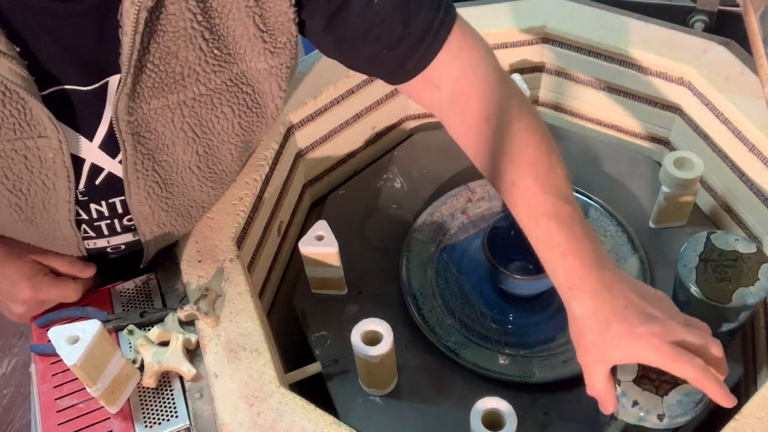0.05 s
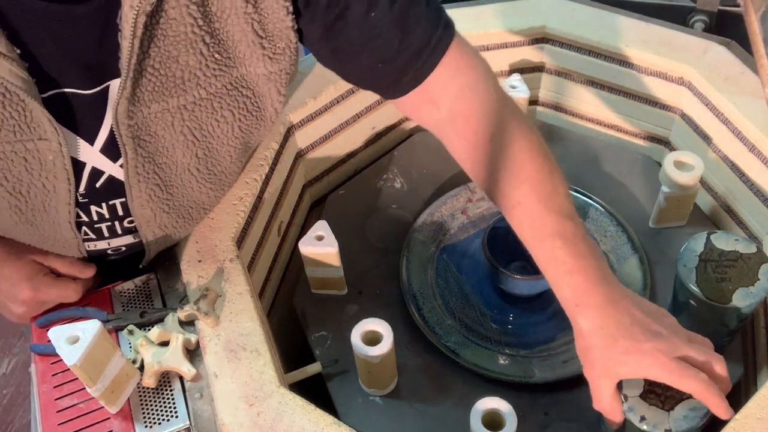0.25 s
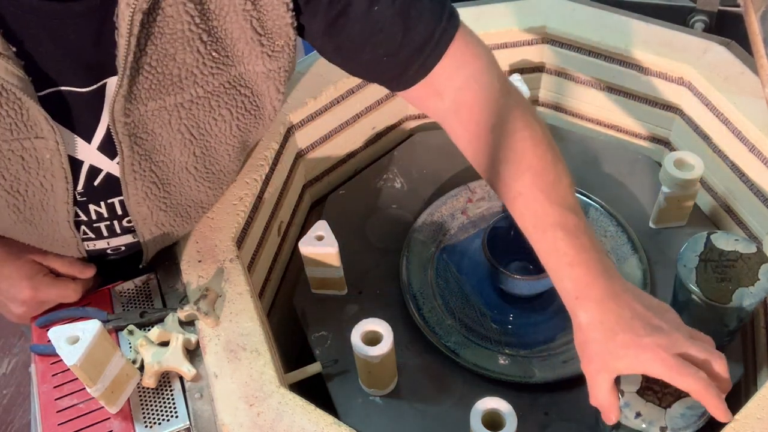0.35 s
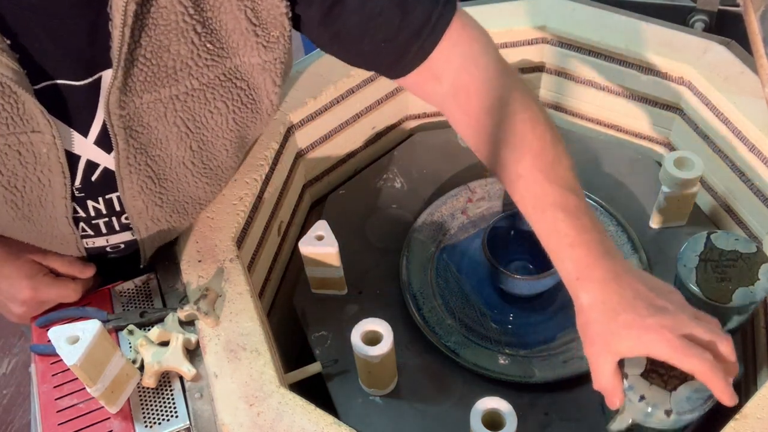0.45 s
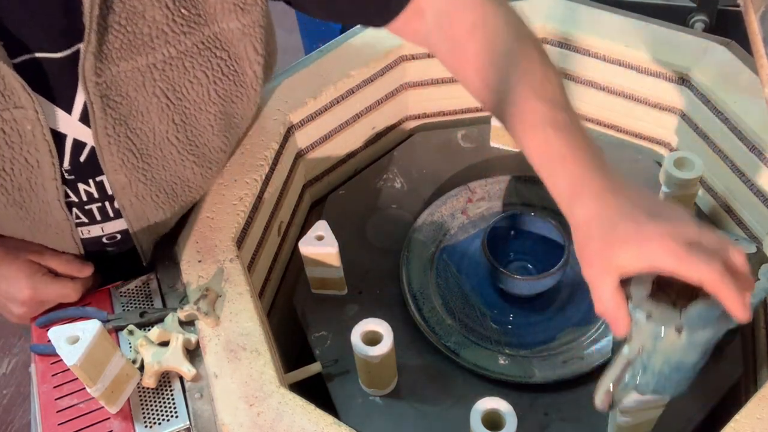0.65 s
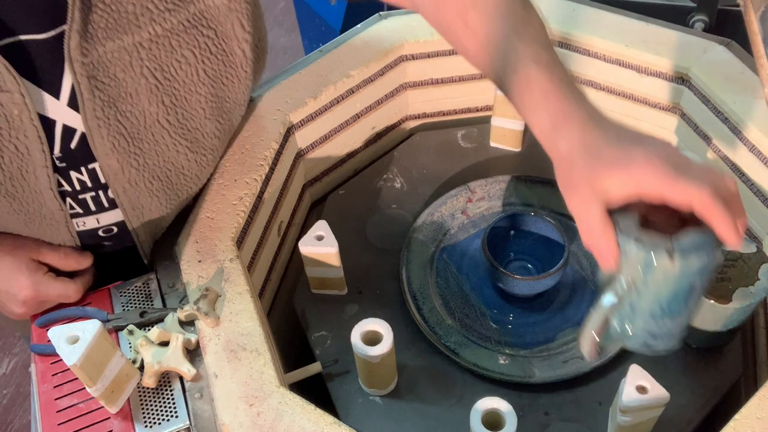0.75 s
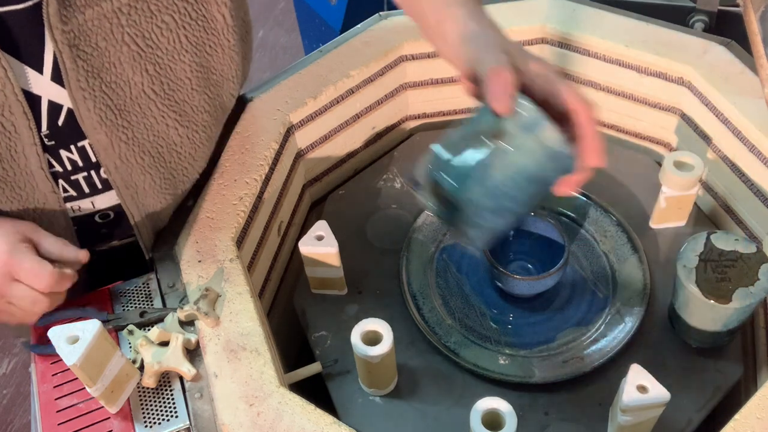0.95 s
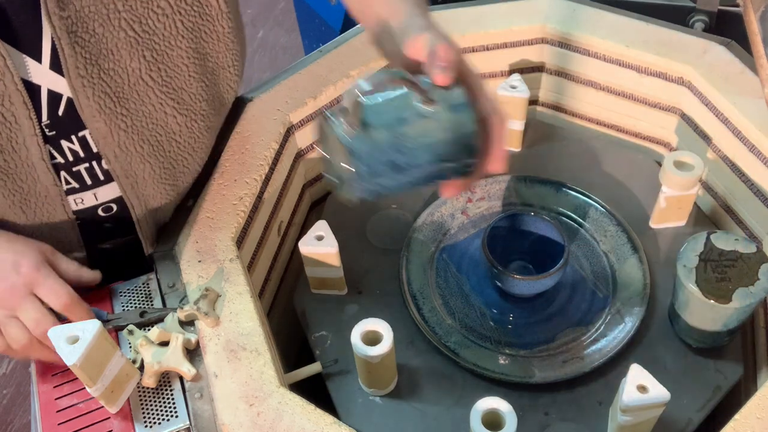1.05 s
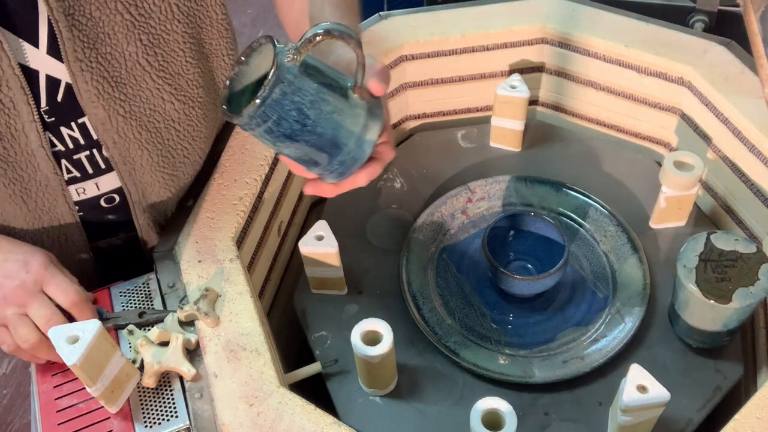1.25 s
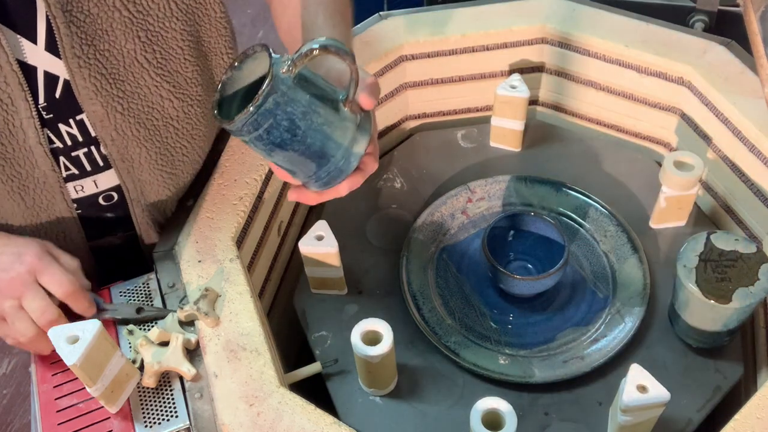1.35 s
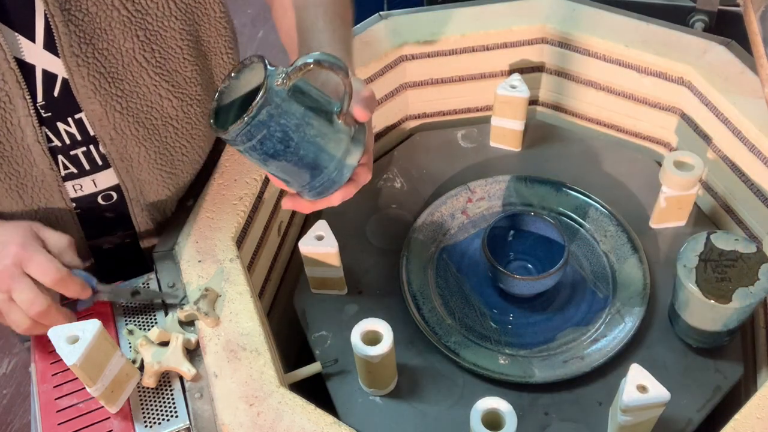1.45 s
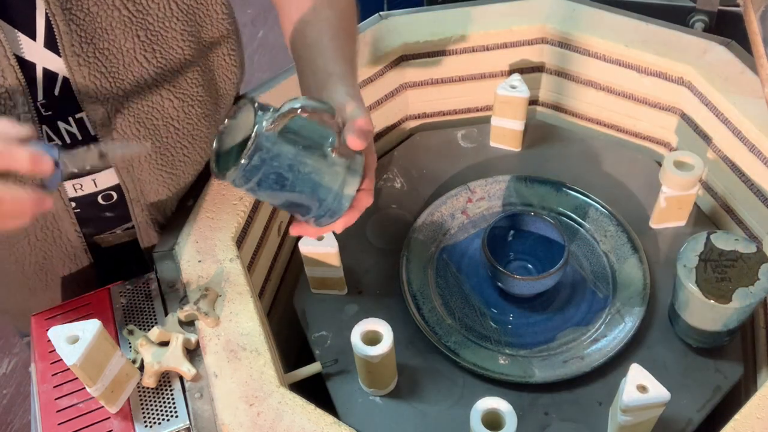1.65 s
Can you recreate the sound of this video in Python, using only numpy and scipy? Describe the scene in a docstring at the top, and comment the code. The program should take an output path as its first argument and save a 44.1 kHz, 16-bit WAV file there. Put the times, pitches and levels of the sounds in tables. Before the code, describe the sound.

A glazed ceramic mug knocks hard on a kiln shelf, then clinks and bumps more lightly

```python
"""Pottery studio, open kiln: a glazed mug is lifted out, knocks hard on the shelf, then clinks and bumps the props.
Shelf and mug are sums of decaying sines; clay cracks, the kiln-well boom and the room's answer are shaped noise.
A fleece sleeve brushes and the body bumps dully (noise swells); the other hand slides over small things on the
rim (gritty noise through resonances). A quiet rumble lies underneath."""
import sys
import numpy as np
from scipy import signal
from scipy.fft import rfft, irfft, next_fast_len
from scipy.io import wavfile
from scipy.ndimage import map_coordinates

SR = 44100
rng = np.random.default_rng(int(sys.argv[2]) if len(sys.argv) > 2 else 0)


def inscribe(sig):
    """Save sig as 16-bit PCM at rate SR to the path in sys.argv[1].

    A 1-D sig is mono; a 2-D sig holds one channel per row.
    Samples are clipped to [-1, 1] before scaling.
    """
    pcm = np.round(np.clip(np.atleast_2d(sig).T, -1, 1) * 32767)
    wavfile.write(sys.argv[1], SR, pcm.astype(np.int16))


N = 74970

# Studio rumble spectrum: freq_hz, level_db
FLOOR_SPECTRUM = [(25, -32), (50, -16), (80, -3), (300, -5), (600, -15), (1200, -22.5), (3000, -29),
                  (8000, -34.5), (13500, -33), (15000, -53.5)]
# Room decay: freq_hz, t60_s
ROOM_DECAY = [(80, 0.85), (500, .7), (2000, 0.58), (5000, 0.52), (12000, .35)]
# Left-right correlation of the noises: freq_hz, correlation
EAR_LIKENESS = [(100, .97), (300, 1), (700, 0.34), (1500, .6), (3000, 0.38), (8000, .65), (14000, .7)]
# Left-right balance: freq_hz, left_minus_right_db
EAR_BALANCE = [(100, 0.5), (370, -1.5), (700, 1), (1300, -0.5), (2400, -7.5), (4300, -6), (8000, -6),
               (14000, -1.5)]
# Sleeve brushes: centre_s, level_db, half_width_s, tilt_db_per_octave
SLEEVE_BRUSHES = [(.385, -63.5, 0.041, 9.5), (0.868, -63, 0.053, -0.5), (1.69, -70, 0.036, -4)]
# Fleece spectrum: freq_hz, level_db
FLEECE_SPECTRUM = [(200, -6.5), (900, 8), (2000, 0), (3700, 2), (6500, -9.5), (9300, -8), (12000, -28),
                   (15000, -31)]
# Dull bumps of the moving body: centre_s, level_db, half_width_s
BODY_BUMPS = [(1.18, -72, 0.031), (1.3, -78, .06), (1.488, -65, .05), (1.68, -68.5, 0.025)]
# Bump spectrum: freq_hz, level_db
BUMP_SPECTRUM = [(40, -26), (85, -2.5), (220, 2), (400, -8.5), (800, -10.5), (2500, -41.5)]
# Slides over rough surfaces: start_s, level_db, rise_s, hold_s, t60_s, tilt_db_per_octave
SLIDES = [(1.133, -52, 0.011, 0.02, 0.48, -2), (1.233, -51, .006, 0.025, 0.29, 1),
          (1.288, -54, 0.0089, 0.0224, .35, 1), (1.39, -59, 0.017, 0.016, .18, 3)]
# Slide spectrum: freq_hz, level_db
SLIDE_SPECTRUM = [(60, -26), (200, -0.5), (700, 4.5), (1300, -1), (2000, -1), (3600, -8), (5500, -8.5),
                  (7000, -22), (9300, -16), (12000, -38.5), (15000, -32)]
# Resonances of the rubbed things: freq_hz, width_hz, level_db
RUBBED_MODES = [(763, 34, 1.5), (1155, 71, 4), (1438, 64, 1.5), (2900, 230, -6.5), (4080, 40, -8.5)]
# Hard clay-on-clay contacts: start_s, level_db, tilt_db_per_octave, soften_above_hz, clay_ring_db
CLAY_CONTACTS = [(.2095, -17, -2, 14000, -9), (.212, -23.5, -3.5, 12000, 1), (.2205, -26, 0, 9000, -15),
                 (.4015, -40, -4.5, 2200, -12), (.5385, -46, -1.5, 3300, -6), (.666, -44.5, 2.5, 4800, -12)]
# Crack spectrum: freq_hz, level_db
CRACK_SPECTRUM = [(300, -19), (900, 1), (1700, 5), (2600, -0.5), (3500, -2.5), (5000, -9), (7000, -16.5),
                  (9500, -16.5), (12000, -27.5), (15000, -44)]
# Short ring of the clay under a contact: freq_hz, level_db, t60_s
CLAY_MODES = [(1047, -3, 0.14), (1396, -1.5, 0.23), (1661, 8, 0.22), (2115, -6, 0.51), (2420, -6.5, 0.27),
              (2573, -6.5, 0.44), (3360, -6, 0.26), (3464, -1, .12), (3810, -6.5, 0.031), (4320, -11, .16),
              (4540, -13.5, .11), (5100, -16, .15)]
# Knocks, first on the shelf and later on the props: start_s, level_db
KNOCKS = [(.008, -35), (0.2114, -13.5), (0.2163, -10), (.402, -31), (.540, -39), (.579, -35),
          (.671, -28)]
# Shelf modes: freq_hz, level_db, t60_s
SHELF_MODES = [(84, -27.5, 0.57), (171.4, -17.5, 0.15), (256.9, -11, 0.18), (315, -14.5, 0.32),
               (386.7, -7, .15), (491, -9.5, 0.037), (525.6, -3, 0.18), (553.3, -12.5, 0.23),
               (605, -16.5, .25), (657, -19, .17)]
# Kiln-well boom spectrum: freq_hz, level_db
BOOM_SPECTRUM = [(30, -50.5), (55, -33.5), (80, -18.5), (150, -13), (260, -5), (530, 2), (750, -10),
                 (1200, -22), (2200, -42), (5000, -75), (9000, -120)]
# Blows that ring the mug's low pair: start_s, level_db, lower_minus_upper_db, build_up_s
MUG_CLINKS = [(.006, -48, 6, 0.018), (.24, -28, -2, 0.033), (.28, -25, -11.5, 0.014),
              (.402, -22.5, 15.5, 0.012), (0.54, -44.5, -6.5, 0.011), (.59, -43.5, 8, 0.0065),
              (.666, -44.5, 13.5, 0.017)]
# Sharp contacts that wake the overtones: start_s, level_db, brightest_hz, width_octaves
MUG_PINGS = [(.24, -38.5, 3300, 0.71), (.402, -48, 6090, 0.47), (.539, -55.5, 11800, 1),
             (.666, -62.5, 8400, 0.3)]
# Mug overtones: freq_hz, level_db, t60_s, left_minus_right_db
MUG_OVERTONES = [(2060, 10.5, 0.14, 1), (3618, -4.5, 0.51, -5), (4360, -11.5, 0.1, -4.5),
                 (5040, -13, 0.22, -2), (5970, 0, 0.22, -4), (6463, -10, 0.15, 0), (7200, -14, 0.067, -6),
                 (7750, -16, .22, -2.5), (8576, -12.5, 0.13, -6), (9170, -5.5, 0.16, -7),
                 (9360, -4, .27, -4), (9706, -15.5, 0.2, -3), (12800, -9, .24, 4), (15000, -13.5, .13, 4)]

FLOOR_DB = -69
GRAINS_PER_S, GRAIN_DB, GRAIN_SPREAD_DB = 700, -6, 4.5
CRACK_T60_S, WELL_DB, WELL_T60_S, CRACK_ROOM_DB = 0.022, -7, 0.2, -19
SHELF_RISE_S, MODE_SCATTER_DB = 0.0025, 2
# Each dB a knock lies below HARD_DB tilts it up by LIGHT_DB_PER_OCT
LIGHT_DB_PER_OCT, HARD_DB, TILT_TOP_HZ = 0.17, -2, 550
SLAP_DB, SLAP_T60_S = -5.5, 0.068  # first, heavily damped swing of the shelf
BOOM_DB, BOOM_RISE_S, BOOM_T60_S, BOOM_ROOM_DB = -8.5, 0.0012, 0.11, -11
# Lowest mug mode, split in two by the handle
PAIR_LOW_HZ, PAIR_HIGH_HZ, PAIR_T60_S, PAIR_LEFT_MINUS_RIGHT_DB = 2239.3, 2300.3, 0.19, -8
LINGER_DB, LINGER_T60_S = -17, 0.6  # ring held by the room
WAVER = 0.75  # depth of each partial's unsteadiness
LEFT_LEAD_S = 0.00025
LOW_CUT_HZ, TOP_HZ = 75, 15200


def amp(db):
    """Decibels to gain."""
    return 10 ** (np.asarray(db) / 20)


def unit(x):
    """Scale to rms 1."""
    return x / np.sqrt(np.mean(x ** 2) + 1e-20)


def along(points, hz):
    """Interpolate (freq_hz, value) points on a log-frequency axis."""
    freq_hz, value = np.transpose(points)
    return np.interp(np.log(hz + 1), np.log(freq_hz + 1), value)


def since(start_s):
    """Seconds since start_s, zero before."""
    return np.maximum(np.arange(N) / SR - start_s, 0)


def fade(t, t60_s):
    """Exponential decay, -60 dB at t60_s."""
    return np.exp(-np.log(1000) * t / t60_s)


def rise(t, time_constant_s):
    """Exponential build-up."""
    return 1 - np.exp(-t / time_constant_s)


def wobble(knots_per_s):
    """Smooth random curve."""
    knots = rng.standard_normal(N // 8)
    return map_coordinates(knots, [np.arange(N) * knots_per_s / SR], mode="wrap")


def filtered(x, response):
    """Multiply the spectrum of x by a response of frequency."""
    size = next_fast_len(N + SR // 4)
    hz = np.fft.rfftfreq(size, 1 / SR)
    return irfft(rfft(x, size) * response(hz), size)[..., :N]


def pan(left_minus_right_db):
    """Left and right gains for a level difference."""
    half_db = left_minus_right_db / 2
    return amp(np.array([half_db, -half_db])).reshape(2, -1)


def tilted(spectrum, tilt_db, hz):
    """Gain of a spectrum tilted per octave."""
    return amp(along(spectrum, hz) + tilt_db * np.log2(hz + 20))


def noise(spectrum, tilt_db=0):
    """Stereo noise of rms 1; mid and side shares set the left-right correlation."""
    def mid_side(hz):
        angle = np.arccos(np.clip(along(EAR_LIKENESS, hz), -1, 1)) / 2
        return tilted(spectrum, tilt_db, hz) * [np.cos(angle), np.sin(angle)]
    mid, side = unit(filtered(rng.standard_normal((2, N)), mid_side))
    stereo = np.array([mid + side, mid - side])
    return unit(filtered(stereo, lambda hz: pan(along(EAR_BALANCE, hz))))


def room_tail(spectrum, tilt_db, start_s):
    """The studio's answer to a blow: noise in which each frequency dies at its own speed."""
    hz, t, bins = signal.stft(noise(spectrum, tilt_db), SR, nperseg=256)
    bins = bins * fade(np.maximum(t - start_s, 0), along(ROOM_DECAY, hz)[:, None])
    tail = signal.istft(bins, SR, nperseg=256)[1][:, :N]
    return tail * rise(since(start_s), 0.0056)


def rumble():
    """Steady low-heavy noise of the quiet studio."""
    return amp(FLOOR_DB) * noise(FLOOR_SPECTRUM)


def swell(centre_s, level_db, half_width_s):
    """Gaussian level swell."""
    t = np.arange(N) / SR
    return amp(level_db) * np.exp(-((t - centre_s) / half_width_s) ** 2 / 2)


def clothes():
    """Soft swells of fleece noise and dull bumps as the body moves."""
    out = np.zeros((2, N))
    for centre_s, level_db, half_width_s, tilt_db in SLEEVE_BRUSHES:
        out += swell(centre_s, level_db, half_width_s) * noise(FLEECE_SPECTRUM, tilt_db)
    for centre_s, level_db, half_width_s in BODY_BUMPS:
        out += swell(centre_s, level_db, half_width_s) * noise(BUMP_SPECTRUM)
    return out


def grit(tilt_db):
    """Tiny catches at random times, of uneven size and coloured like the slide."""
    hits = rng.random(N) < GRAINS_PER_S / SR
    sizes = amp(GRAIN_SPREAD_DB * rng.standard_normal(N))
    catches = hits * rng.choice([-1, 1], N) * sizes
    return unit(filtered(catches, lambda hz: tilted(SLIDE_SPECTRUM, tilt_db, hz) * pan(along(EAR_BALANCE, hz))))


def rubbed_body(hz):
    """Response of the rubbed things: direct path plus band-pass resonances."""
    response = 1
    for mode_hz, width_hz, level_db in RUBBED_MODES:
        damping = 1j * hz * width_hz
        response = response + amp(level_db) * damping / (mode_hz ** 2 - hz ** 2 + damping)
    return response


def slides():
    """Short gritty friction strokes through a few resonances: rise, hold, release."""
    out = np.zeros((2, N))
    for start_s, level_db, rise_s, hold_s, t60_s, tilt_db in SLIDES:
        stroke = np.minimum(since(start_s) / rise_s, 1) * fade(since(start_s + rise_s + hold_s), t60_s)
        rub = noise(SLIDE_SPECTRUM, tilt_db) + amp(GRAIN_DB) * grit(tilt_db)
        out += amp(level_db) * stroke * unit(filtered(rub, rubbed_body))
    return out


def clay_ring(t):
    """Short modal ring of the clay, random phases."""
    ring = np.zeros((2, N))
    for hz, level_db, t60_s in CLAY_MODES:
        sine = np.sin(2 * np.pi * hz * t + rng.uniform(0, 2 * np.pi))
        ring += amp(level_db) * sine * fade(t, t60_s) * pan(along(EAR_BALANCE, hz))
    return ring * rise(t, 0.001) / np.sqrt(len(CLAY_MODES))


def cracks():
    """Noise crack and clay ring at each contact, scattered by kiln walls and room; softer ones lose treble."""
    out = np.zeros((2, N))
    for start_s, level_db, tilt_db, soft_hz, ring_db in CLAY_CONTACTS:
        t = since(start_s)
        direct = rise(t, 0.00056) * fade(t, CRACK_T60_S)
        well = amp(WELL_DB) * rise(t, 0.004) * fade(t, WELL_T60_S)
        hit = noise(CRACK_SPECTRUM, tilt_db) * np.hypot(direct, well)
        hit += amp(ring_db) * clay_ring(t)
        hit += amp(CRACK_ROOM_DB) * room_tail(CRACK_SPECTRUM, tilt_db, start_s)
        out += amp(level_db) * filtered(hit, lambda hz: 1 / np.sqrt(1 + (hz / soft_hz) ** 8))
    return out


def shelf_ring(t, tilt_db):
    """Shelf modes, each a damped first swing plus a longer decay."""
    ring = np.zeros((2, N))
    for hz, level_db, t60_s in SHELF_MODES:
        tilt_gain_db = tilt_db * np.log2(min(hz, TILT_TOP_HZ) / TILT_TOP_HZ)
        gain = amp(level_db + tilt_gain_db + rng.normal(0, MODE_SCATTER_DB))
        decay = fade(t, t60_s) + amp(SLAP_DB) * fade(t, SLAP_T60_S)
        ring += gain * decay * np.sin(2 * np.pi * hz * t) * pan(along(EAR_BALANCE, hz))
    return ring * rise(t, SHELF_RISE_S)


def shelf():
    """Each knock rings the shelf modes and booms in the kiln well; light knocks carry less bass."""
    out = np.zeros((2, N))
    for start_s, level_db in KNOCKS:
        t = since(start_s)
        tilt_db = LIGHT_DB_PER_OCT * (HARD_DB - level_db)
        boom = noise(BOOM_SPECTRUM, tilt_db) * rise(t, BOOM_RISE_S) * fade(t, BOOM_T60_S)
        boom += amp(BOOM_ROOM_DB) * room_tail(BOOM_SPECTRUM, tilt_db, start_s)
        out += amp(level_db) * (shelf_ring(t, tilt_db) + amp(BOOM_DB) * boom)
    return out


def partial(hz, t, knots_per_s=35):
    """Sine that wavers differently at each ear."""
    phase = 2 * np.pi * hz * t
    left = wobble(knots_per_s) * np.sin(phase)
    right = wobble(knots_per_s) * np.cos(phase)
    return np.sin(phase) + WAVER * np.array([left, right])


def mug_pair():
    """Two close low modes beat and build up in the kiln well."""
    out = np.zeros((2, N))
    for start_s, level_db, split_db, build_s in MUG_CLINKS:
        t = since(start_s)
        pair = amp(split_db / 2) * partial(PAIR_LOW_HZ, t) + amp(-split_db / 2) * partial(PAIR_HIGH_HZ, t)
        decay = fade(t, PAIR_T60_S) + amp(LINGER_DB) * fade(t, LINGER_T60_S)
        out += amp(level_db) * unit(pair) * rise(t, build_s) * decay * pan(PAIR_LEFT_MINUS_RIGHT_DB)
    return out


def mug_overtones():
    """Overtones speak at once, weighted by a log-frequency bell around each ping's brightest pitch."""
    out = np.zeros((2, N))
    for start_s, ping_db, bright_hz, width_octaves in MUG_PINGS:
        t = since(start_s)
        for hz, level_db, t60_s, side_db in MUG_OVERTONES:
            share = np.exp(-(np.log2(hz / bright_hz) / width_octaves) ** 2 / 2)
            tone = partial(hz, t, knots_per_s=130) * rise(t, 0.001) * fade(t, t60_s)
            out += amp(ping_db + level_db) * share * tone * pan(side_db)
    return out


def scene():
    """Sum of all sources, the left channel leading."""
    sound = rumble() + clothes() + slides() + cracks() + shelf() + mug_pair() + mug_overtones()
    sides = np.array([[1], [-1]])  # each channel shifts by half the lead
    return filtered(sound, lambda hz: np.exp(1j * np.pi * hz * LEFT_LEAD_S * sides))


def record(dry):
    """Second-order low cut and a sharp upper band limit."""
    def response(hz):
        ratio = hz / LOW_CUT_HZ
        low_cut = (1j * ratio) ** 2 / (1 + 1j * ratio - ratio ** 2)
        return low_cut * (hz < TOP_HZ)
    return filtered(dry, response)


dry = scene()
out = record(dry)
inscribe(out)
```